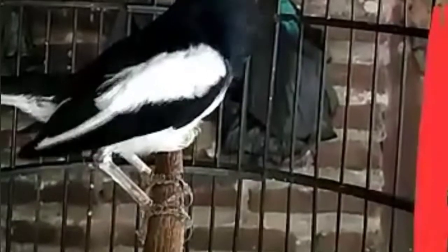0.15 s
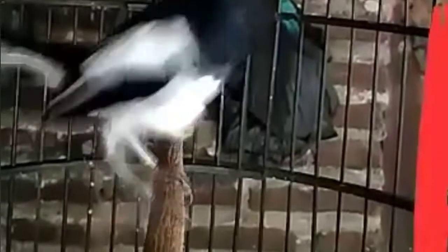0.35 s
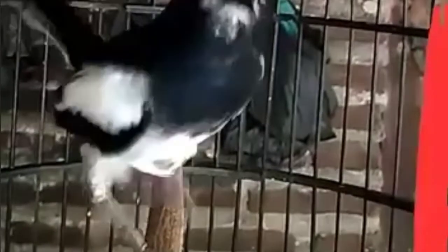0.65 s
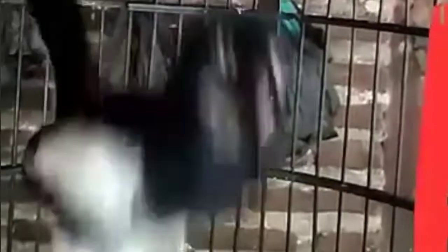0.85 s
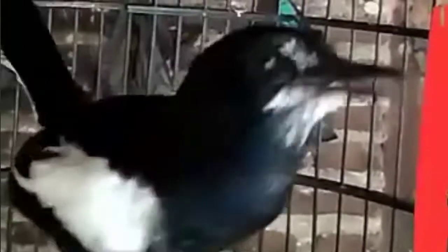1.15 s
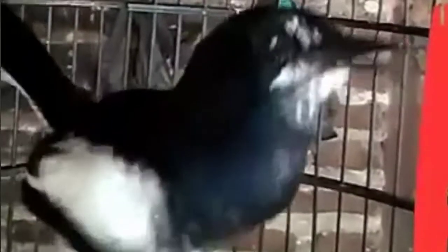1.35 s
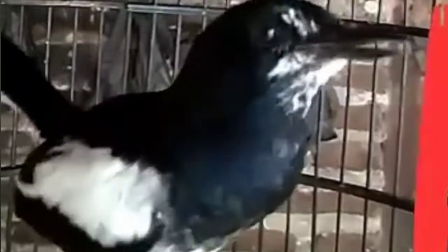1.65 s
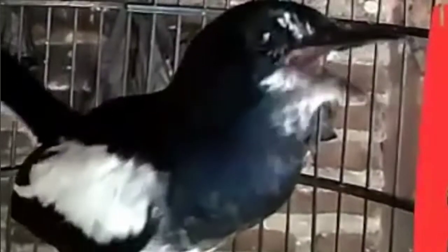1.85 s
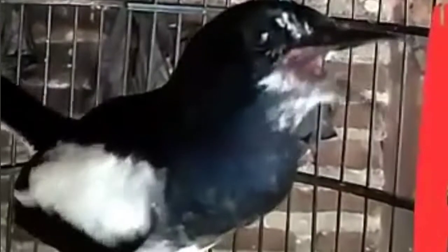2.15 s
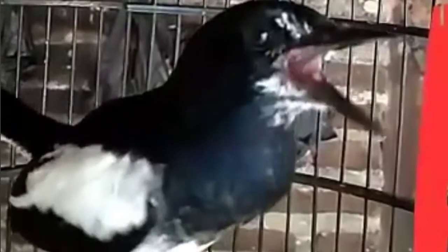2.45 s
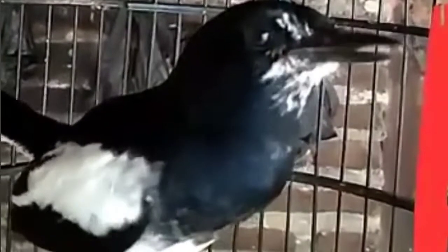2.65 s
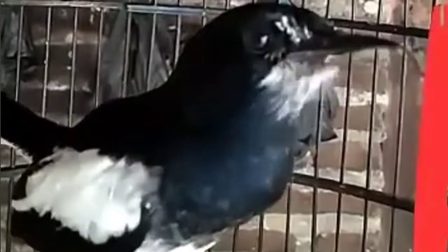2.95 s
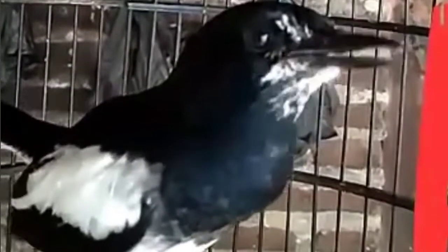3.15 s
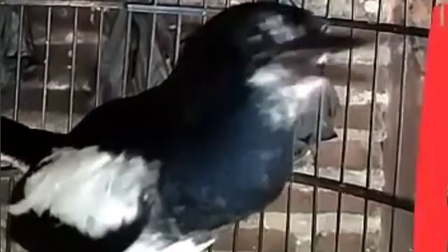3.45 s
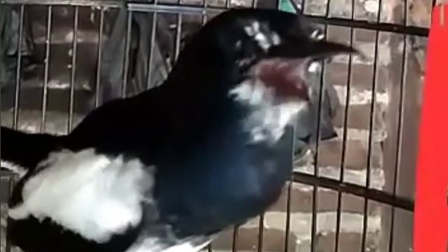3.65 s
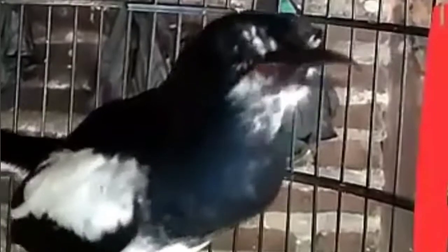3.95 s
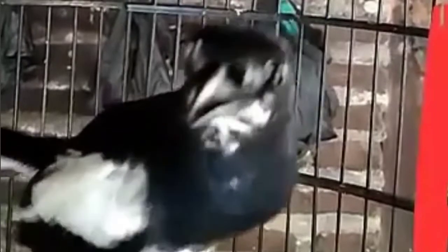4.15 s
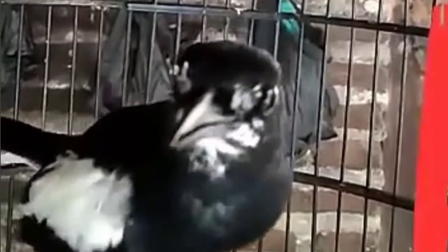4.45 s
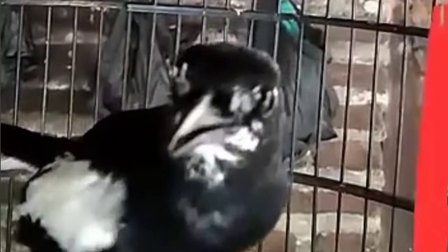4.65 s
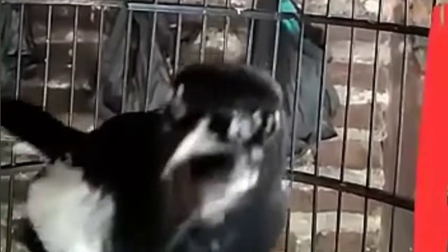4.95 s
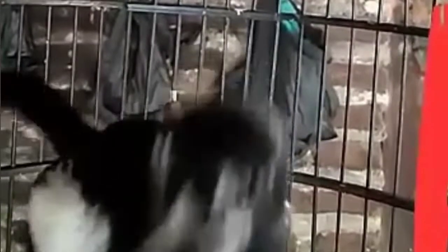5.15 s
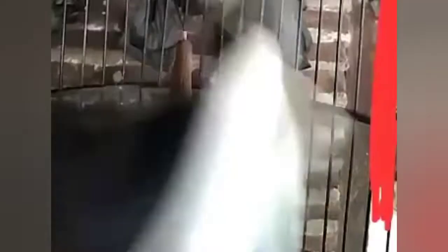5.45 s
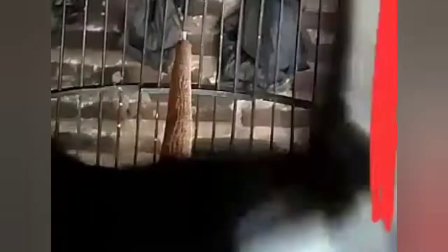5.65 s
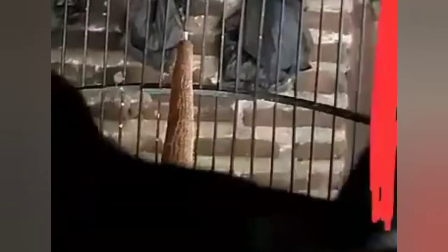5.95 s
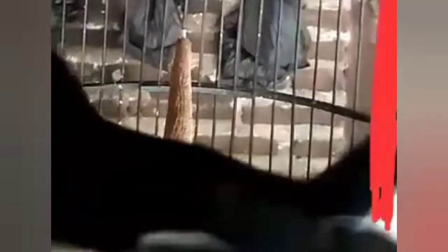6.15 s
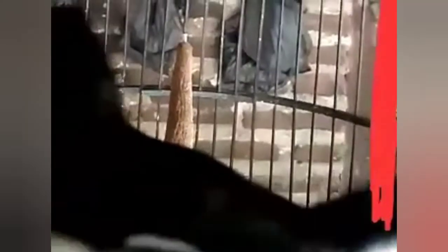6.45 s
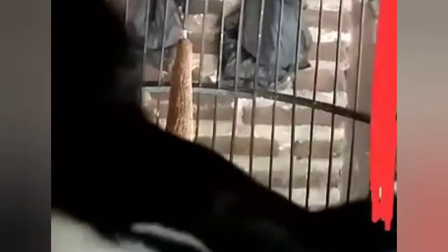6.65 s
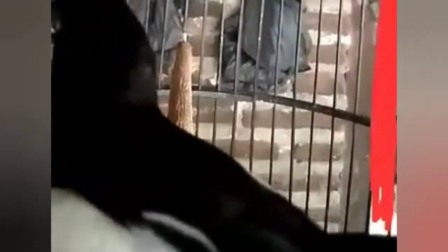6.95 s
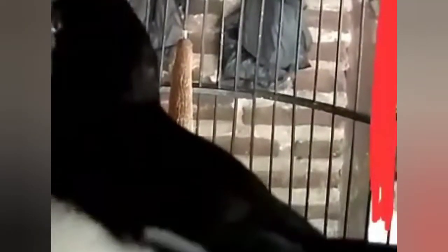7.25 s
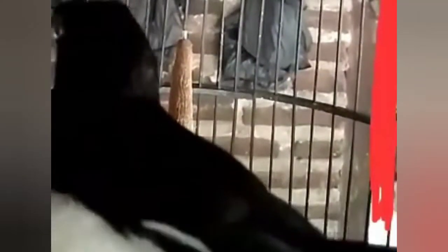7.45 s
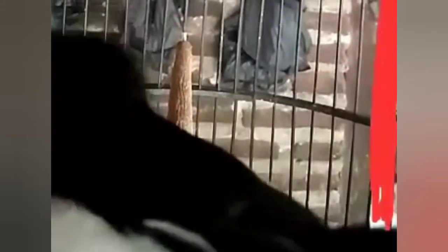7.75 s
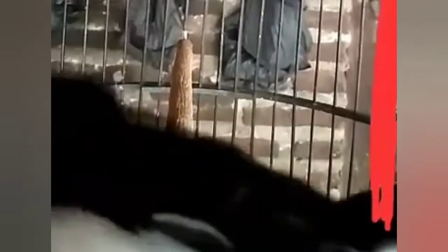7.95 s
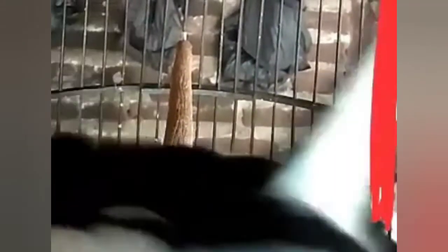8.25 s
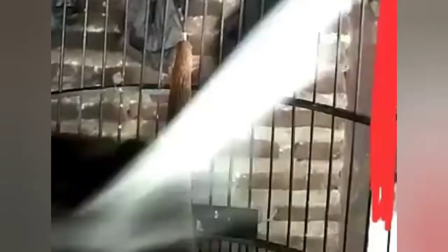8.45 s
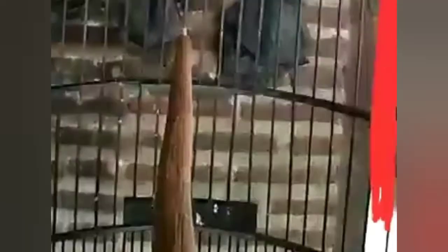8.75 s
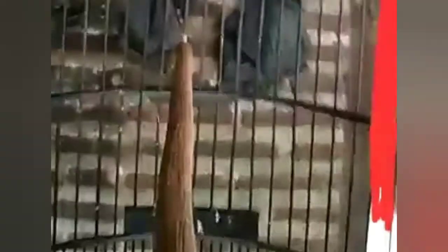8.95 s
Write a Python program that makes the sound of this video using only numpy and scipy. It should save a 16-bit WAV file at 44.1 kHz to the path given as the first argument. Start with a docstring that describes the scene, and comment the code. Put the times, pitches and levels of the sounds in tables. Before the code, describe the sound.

Loud close birdsong indoors, with quick whistles, buzzy double notes, harsh rasps, beak-air thumps and two bright trills, stopping abruptly at the end.

```python
"""A songbird sings close to a pair of microphones in a small hard room, over a faint steady noise.
First a little air from the beak buffets the microphones, then whistles begin: gliding tones with overtones.
Both sides of the syrinx often sound at once, and notes break into rasps of grainy noise.
Near 2 s and again near 5 s comes a trill, each chirp ending in a short burst of bright noise.
Whistles, croaks and rasps go on between and after the trills, until all sound stops just past 9 s."""
import sys
import numpy as np
from scipy import signal
from scipy.fft import rfft, irfft, next_fast_len
from scipy.io import wavfile
from scipy.ndimage import uniform_filter1d

SR = 44100
rng = np.random.default_rng(int(sys.argv[2]) if len(sys.argv) > 2 else 0)


def file_out(sig):
    """Save sig as 16-bit WAV at sys.argv[1]."""
    # one column per channel
    cols = np.atleast_2d(sig).T
    # limit, then scale
    lim = np.clip(cols, -1, 1)
    pcm = np.round(lim * 32767).astype(np.int16)
    wavfile.write(sys.argv[1], SR, pcm)


N = 400869   # length in samples

# Pushes of air through the beak. Each row: start in seconds, length in seconds, rasp level in dB and
# buffeting level in dB (both at the end of the push, before trims), swell up to there in dB.
AIR_PUSHES = [(0.05, 0.084, -59, -47.5, 42), (0.147, 0.094, -31, -34.5, 10),
              (0.226, 0.0083, -10.5, -46, 9.5), (0.302, 0.05, -7.5, -21, 33),
              (0.41, 0.084, -10, -20.5, 23.5), (0.55, 0.033, -13.5, -24.5, 15.5),
              (0.737, 0.24, -22, -23, 9.5), (1.019, 0.071, -12, -15.5, 10), (1.138, 0.04, -10, -22, 22),
              (1.349, 0.034, -28, -70, 14), (1.419, 0.15, -38.5, -68, 10), (1.626, 0.041, -27, -59, 15),
              (1.701, 0.15, -45.5, -81, -8), (1.844, 0.25, -20.5, -26.5, 2),
              (2.19, 0.32, -13.5, -25.5, -1.5), (2.544, 0.012, -18.5, -50, -2),
              (2.585, 0.064, -26, -80, -12), (3.059, 0.071, -11.5, -23, 7.5), (3.34, 0.05, -25.5, -28, 5.5),
              (3.408, 0.037, -20.5, -19.5, 10), (3.601, 0.088, -23.5, -15, 4.5),
              (3.68, 0.026, -11, -33, 13), (3.777, 0.18, -40, -48.5, -19), (4.011, 0.068, -26, -24.5, -9),
              (4.094, 0.05, -16.5, -20, 8.5), (4.334, 0.051, -13.5, -26.5, 14), (4.601, 0.051, -23, -40, 0),
              (4.865, 0.068, -11.5, -19, 7), (4.929, 0.055, -28, -41, -5), (5.002, 0.081, -23, -25.5, -11),
              (5.171, 0.34, -14, -21.5, 0), (5.559, 0.055, -17.5, -35, 6.5), (5.9, 0.054, -15.5, -24, 21),
              (6.089, 0.044, -25, -45, 8.5), (6.258, 0.058, -22.5, -26.5, 2.5), (6.431, 0.039, -22, -37, 2),
              (6.487, 0.021, -16, -51, 9.5), (6.781, 0.07, -17.5, -26, 38.5), (7.12, 0.25, -44, -80, -12),
              (7.675, 0.091, -12.5, -36, 7), (8.01, 0.12, -27, -27.5, 7), (8.123, 0.027, -17, -22, 13),
              (8.32, 0.11, -20, -19.5, 10), (8.416, 0.032, -10, -37, 15), (8.52, 0.18, -35, -47.5, -10),
              (8.796, 0.089, -23.5, -30, 2), (8.899, 0.053, -17, -33.5, 1.5), (8.958, 0.086, -32, -65, -12)]
# Colour of the rasp. Each row: frequency in Hz, relative level in dB per Hz.
RASP_SPECTRUM = [(240, -53.5), (400, -8), (1010, -2.5), (1910, 2.5), (4010, 1), (5320, -0.5), (12900, -11),
                 (14000, -28)]
# Where the bird stands. Each row: time in seconds, level of the right microphone in dB,
# delay of the left microphone behind the right in milliseconds.
STANCE = [(0, -7.5, 0.1), (4.5, -6.5, 0.09), (6.5, -6, 0.019), (9.1, -9.5, 0.034)]

# Voices. Each one: 2nd harmonic in dB and 3rd harmonic in dB (against the first), flutter from 0 to 1.
CLEAR_VOICE, EDGED_VOICE, NASAL_VOICE = (-22.5, -27, 0.086), (-18.5, -27, 0.099), (0.43, -6.5, 0.21)
STEADY_VOICE, SHAKY_VOICE = (-27, -33, .025), (-16.5, -26, 0.36)
REEDY_VOICE, HOARSE_VOICE = (5, -6, 0.013), (-29, -48, 0.66)

# Clear whistles, almost pure tones. Each row: start in seconds, length in seconds, first pitch in Hz,
# last pitch in Hz, level in dB.
CLEAR_WHISTLES = [(0.143, 0.0076, 7600, 6160, -27.5), (0.48, 0.069, 3530, 3675, -20),
                  (0.785, 0.048, 1147, 1360, -18.5), (0.238, 0.017, 4820, 4320, -11),
                  (0.266, 0.027, 3770, 3100, -17.5), (0.329, 0.013, 3900, 3860, -11.5),
                  (0.339, 0.011, 3430, 2320, -11.5), (0.449, 0.016, 7830, 8500, -16),
                  (0.857, 0.05, 1524, 1569, -11), (0.984, 0.044, 1243, 1343, -18),
                  (1.073, 0.067, 1500, 1164, -17.5), (1.068, 0.02, 4470, 3030, -18),
                  (1.08, 0.051, 4030, 3650, -23), (1.281, 0.042, 3080, 2883, -19),
                  (1.282, 0.06, 2165, 2420, -25.5), (1.367, 0.019, 4000, 2700, -13),
                  (1.652, 0.023, 3760, 2890, -16.5), (7.53, 0.47, 840, 847, -51),
                  (2.09, 0.017, 1772, 1755, -9.5), (2.117, 0.057, 1722, 1718, -10),
                  (2.156, 0.033, 1714, 1790, -20.5), (2.211, 0.082, 1852, 1823, -7),
                  (2.306, 0.047, 1740, 1816, -26), (2.356, 0.065, 1870, 1915, -11.5),
                  (2.418, 0.058, 1877, 2004, -12.5), (2.461, 0.048, 2023, 2030, -19),
                  (2.642, 0.09, 2340, 2450, -23), (2.84, 0.047, 2907, 2948, -24),
                  (0.748, 0.034, 913, 990, -29.5)]
# Whistles with an audible octave. Each row: start in seconds, length in seconds, first pitch in Hz,
# last pitch in Hz, level in dB.
EDGED_WHISTLES = [(0.148, 0.044, 6070, 5735, -16.5), (0.182, 0.06, 1882, 2023, -25.5),
                  (0.259, 0.077, 1963, 2152, -17.5), (0.432, 0.049, 2270, 2360, -25),
                  (0.503, 0.052, 2366, 2405, -10.5), (1.422, 0.11, 770, 1024, -28),
                  (1.63, 0.11, 776, 1013, -29), (1.823, 0.1, 829, 900, -29.5),
                  (4.981, 0.024, 1380, 1300, -22), (8.8, 0.037, 4790, 4620, -21)]
# Freer figures, each sung once. Each entry: a voice, then rows of time in seconds, pitch in Hz, level in dB.
FIGURES = [ (EDGED_VOICE, [(0.545, 2700, -11), (0.56, 3250, -23.5), (0.578, 3485, -6), (0.584, 2600, -20)]),
           (NASAL_VOICE, [(0.584, 2474, -16.5), (0.602, 2630, -8.5)]), (SHAKY_VOICE, [(1.03, 3940, -30.5),
           (1.048, 4860, -22.5), (1.075, 5190, -32.5), (1.14, 5200, -18)]),
           (REEDY_VOICE, [(4.009, 1794, -37), (4.021, 2450, -20), (4.055, 2560, -25)]),
           (NASAL_VOICE, [(8.918, 2040, -27), (8.94, 1955, -33), (8.958, 1890, -29)]),
           (SHAKY_VOICE, [(4.129, 5570, -31), (4.14, 4400, -22), (4.152, 3800, -21.5), (4.163, 4330, -13.5),
           (4.168, 3670, -15.5), (4.195, 3380, -27.5)]), (SHAKY_VOICE, [(5.034, 1636, -17),
           (5.05, 1892, -23.5), (5.07, 1630, -25.5), (5.094, 2144, -22.5), (5.112, 2200, -16),
           (5.121, 1914, -31), (5.14, 2240, -19)]), (SHAKY_VOICE, [(8.995, 1790, -25), (9.006, 2090, -17.5),
           (9.025, 1726, -26.5), (9.045, 1880, -24.5), (9.064, 1630, -32.5)]),
           (NASAL_VOICE, [(0.738, 2720, -22.5), (0.756, 2924, -19), (0.798, 2560, -14), (0.813, 2810, -27),
           (0.876, 2896, -18.5), (0.899, 2697, -9.5)]), ((-17, -17, 0.38), [(0.93, 3010, -26),
           (0.945, 3810, -13.5), (0.97, 3860, -24.5), (0.99, 3845, -9), (1.003, 3740, -35)]),
           ((-39, -45, 0.23), [(1.148, 2920, -32), (1.158, 3100, -10), (1.172, 3240, -4),
           (1.182, 2740, -20), (1.186, 2730, -8.5), (1.212, 2524, -19), (1.218, 2380, -15.5),
           (1.24, 1970, -17)]), (CLEAR_VOICE, [(1.853, 3060, -17), (1.865, 3465, -17.5),
           (1.885, 3280, -10.5), (1.903, 3310, -17.5), (1.927, 3615, -17), (1.939, 3385, -10),
           (1.957, 3500, -25), (1.975, 3300, -15.5)]), (EDGED_VOICE, [(1.919, 1165, -21),
           (1.955, 1372, -23.5), (1.981, 1774, -6), (2.028, 1690, -28.5), (2.062, 1720, -20)]),
           (CLEAR_VOICE, [(2.739, 2040, -18), (2.757, 2656, -12), (2.79, 2070, -20), (2.799, 1850, -22),
           (2.82, 1880, -25)]), (REEDY_VOICE, [(3.598, 2420, -20), (3.608, 2440, -17), (3.626, 2276, -17.5),
           (3.65, 2346, -18), (3.732, 2380, -20), (3.76, 2490, -37)]), (CLEAR_VOICE, [(4.867, 2750, -18.5),
           (4.876, 3570, -16.5), (4.889, 3720, -20), (4.901, 3473, -8), (4.913, 3500, -15),
           (4.926, 3710, -12), (4.94, 3610, -14.5), (4.953, 3776, -8), (4.965, 3530, -27.5),
           (4.98, 3800, -46)]), ((11.8, -17, 0.23), [(5.556, 1336, -18), (5.575, 1315, -9),
           (5.612, 1291, -10.5), (5.627, 1230, -49)]), (STEADY_VOICE, [(5.88, 2840, -34.5),
           (5.904, 2663, -11), (5.918, 2622, -8), (5.928, 2720, -6.5), (5.936, 3510, -16.5),
           (5.94, 3606, -11.5), (5.974, 3452, -6), (5.986, 3790, -24.5)]),
           (STEADY_VOICE, [(6.07, 2536, -31.5), (6.084, 1990, -25.5), (6.098, 2020, -16.5),
           (6.106, 2100, -17), (6.114, 2526, -7), (6.14, 2502, -3), (6.158, 2650, -36)]),
           (EDGED_VOICE, [(6.215, 4950, -38), (6.245, 4585, -23.5), (6.3, 4577, -19), (6.322, 4490, -14),
           (6.334, 3230, -25.5)]), ((6.1, 8.8, 0.17), [(6.199, 1621, -24), (6.25, 1585, -32),
           (6.313, 1855, -35.5), (6.349, 1900, -28.5), (6.402, 1707, -23.5), (6.426, 1640, -39)]),
           (CLEAR_VOICE, [(6.405, 2600, -33), (6.425, 2620, -14), (6.445, 2580, -8.5), (6.457, 3117, -8.5),
           (6.473, 2420, -8), (6.483, 2280, -15), (6.513, 2190, -24)]), ((-11.5, -19, 0.086),
           [(6.736, 3530, -30), (6.77, 3874, -25), (6.846, 4363, -20.5), (7.03, 4165, -28),
           (7.11, 4020, -25.5)]), ((-12.5, -20, 0.17), [(7.105, 3903, -25), (7.2, 3470, -18.5),
           (7.32, 2890, -26), (7.366, 2777, -22), (7.39, 2810, -61)]), ((-1.5, -0.44, 0.17),
           [(6.819, 1455, -40), (6.887, 1623, -34), (6.975, 1924, -28.5), (7.01, 1900, -31.5),
           (7.1, 1514, -33.5)]), (REEDY_VOICE, [(8.319, 2630, -26), (8.328, 2406, -18),
           (8.352, 2310, -18.5), (8.396, 2564, -21), (8.44, 2474, -26), (8.46, 2390, -11.5)]),
           ((9.2, 7.9, 0.1), [(8.518, 1990, -22), (8.53, 1930, -24.5), (8.6, 1970, -21), (8.65, 1938, -22),
           (8.68, 1860, -22.5)]), ]
# Syllables sung from a set shape. Each entry: a voice; shape rows of share of the length, pitch in Hz,
# level in dB; sung rows of start in seconds, length in seconds, pitch ratio, added level in dB.
SYLLABLES = { "drop": ((-15.5, -22, 0.078), [(0, 2584, -6), (.3, 2343, -2), (.75, 1750, -8), (1, 1503, -4)],
             [(1.356, 0.025, 0.98, -9.5), (1.638, 0.028, 1.01, -9)]), "double": ((-23, -45, 0.077),
             [(0, 1332, -21), (.15, 1265, 2.5), (.3, 1333, -10), (.52, 1278, 7), (.7, 1290, -21),
             (1, 1325, -6.5)], [(1.533, 0.039, 1.005, -17), (1.718, 0.063, .995, -17)]),
             "croak": ((5.8, 10.9, 0.012), [(0, 1005, 5), (.25, 1192, 6.5), (.55, 1167, 3),
             (.85, 1050, 10.5), (1, 946, 2)], [(3.038, 0.15, .99, -29.5), (7.658, .15, 1.04, -33.5)]),
             "arch": ((1, -8, 0.035), [(0, 2575, -6.5), (.09, 2918, 1.5), (.55, 3026, 2), (.8, 2960, 4),
             (1, 2448, 3.5)], [(3.327, 0.15, .995, -20), (8.007, 0.16, 1.015, -19.5)]),
             "flat": ((0.79, 0.19, 0.067), [(0, 1787, 10), (.06, 1923, 0.5), (.3, 1842, 6), (.72, 1902, 2),
             (.86, 1740, 7.5), (1, 1780, -22)], [(3.773, 0.16, 1, -24)]), "loop": ((-11, -12, 0.16),
             [(0, 1758, -19), (.07, 2430, -6), (.24, 2600, -3), (.28, 3000, -2.5), (.31, 3845, -2.5),
             (.39, 4186, -1.5), (.575, 4280, -2.5), (.61, 3300, -0.5), (.68, 2460, -1.5),
             (.82, 1920, -12.5), (1, 1676, -12.5)], [(4.008, .187, .995, -15), (8.785, .19, 1.04, -22)]),
             "kick": ((-16, -23, 0.063), [(0, 2084, -20.5), (.08, 1980, -14.5), (.16, 1891, -12.5),
             (.23, 3237, 0.5), (.27, 2284, -3), (.55, 2420, -2.5), (.86, 2419, -2.5), (1, 2215, -8.5)],
             [(4.336, 0.094, 1.005, -5.5), (4.593, 0.088, .99, -5.5)]), }
# Hoarse whistles, shaken into a buzz. Each row: start in seconds, length in seconds, first pitch in Hz,
# last pitch in Hz, level in dB.
HOARSE_WHISTLES = [(2.566, 0.09, 2540, 2416, -18), (8.578, 0.051, 2330, 2120, -21.5),
                   (8.972, 0.025, 2554, 2555, -17), (2.597, 0.046, 1520, 1100, -34),
                   (5.563, 0.055, 3180, 3295, -21.5), (5.564, 0.058, 2023, 2044, -25.5)]

# Chirps of the two trills. Each row: middle of the chirp in seconds, chirp level in dB, pitch ratio,
# seconds until the burst of air, burst level in dB.
TRILL_CHIRPS = [(2.019, -16, 0.94, 0.0094, -39.5), (2.053, -13.5, 0.98, 0.026, -24),
                (2.204, -13.5, 0.96, 0.01, -19), (2.256, -13, 0.95, 0.015, -20),
                (2.313, -16.5, 1.0, 0.019, -16), (2.371, -16.5, 0.93, 0.014, -18),
                (2.433, -17, 0.97, 0.0053, -25), (2.489, -20.5, 0.86, 0.012, -12),
                (5.023, -9.5, 1.014, 0.015, -33.5), (5.063, -11.5, 0.99, 0.016, -13.5),
                (5.19, -11.5, 1.005, 0.021, -14.5), (5.243, -14, 0.98, 0.016, -13),
                (5.297, -13.5, 0.96, 0.016, -9.5), (5.357, -15, 0.98, 0.011, -11),
                (5.417, -17, 0.97, 0.013, -13.5), (5.489, -20, 0.88, 0.018, -13)]
# Shape of one chirp. Each row: seconds from its middle, pitch in Hz before the ratio, added level in dB.
CHIRP_SHAPE = [(-.017, 2513, -10), (-.011, 3400, -3), (.0, 3500, 0), (.010, 3420, 0), (0.016, 2600, -3)]
# Voices of the first and second trill. Each row: 2nd harmonic in dB, 3rd harmonic in dB, flutter from 0 to 1.
CHIRP_VOICES = [(-5.5, -24.5, 0.1), (-13.5, -23, 0.09)]


def from_db(db):
    """Turns decibels into gain."""
    return 10 ** (np.asarray(db) / 20)


def rms_one(x):
    """Scales a sound to an rms (average strength) of 1."""
    return x / np.sqrt(np.mean(x ** 2) + 1e-20)


def in_time(rows, at):
    """Reads the columns of a table at the times given, with straight lines between rows."""
    s, *columns = np.transpose(rows)
    return [np.interp(at, s, column) for column in columns]


def band(x, low_hz, high_hz):
    """Lets through the frequencies between two limits (Butterworth filter)."""
    return signal.sosfilt(signal.butter(2, [low_hz, high_hz], "band", fs=SR, output="sos"), x)


def coloured(x, spectrum):
    """Shapes a sound by a spectrum table and scales it to an rms of 1."""
    hz, db = np.transpose(spectrum)
    size = next_fast_len(N)
    grid = np.arange(1, size // 2 + 2) * SR / size
    gain = from_db(np.interp(np.log(grid), np.log(hz), db))
    return rms_one(irfft(rfft(x, size) * gain, size)[..., :N])


def faint_floor():
    """A faint steady noise, drawn separately for each microphone."""
    return from_db(-67) * rms_one(band(rng.standard_normal((2, N)), 40, 5100))


def air_pushes(t):
    """Rasp and buffeting in dB: each push starts sharply, swells, is cut off, fades; the strongest counts."""
    coarse = t[::40]
    s, length, rasp_db, buffet_db, swell_db = np.transpose(AIR_PUSHES)[:, :, None]
    after = np.maximum(coarse - s - length, 0)
    # slopes are in dB per second; the steep cut gives way to the slower fade
    rise_db = 2504.5 * np.maximum(s - coarse, 0)
    fall_db = np.minimum(591.5 * after, 11.5 + 182.5 * after)
    short_db = swell_db * np.clip(1 - (coarse - s) / length, 0, 1)
    levels = []
    for end_db in (rasp_db, buffet_db):
        strongest = np.max(end_db - short_db - rise_db - fall_db, axis=0)
        levels.append(np.interp(t, coarse, np.maximum(strongest, -107.5)))
    return levels


def turbulence(grain_db, alike):
    """Rough air: grainy noise for two microphones that share a part of it (alike, 0 to 1)."""
    grains = rng.standard_normal((3, N)) * from_db(grain_db * rng.standard_normal(N))
    return np.sqrt(alike) * grains[0] + np.sqrt(1 - alike) * grains[1:]


def smooth(x, bands, frames):
    """Averages a time-frequency picture over nearby bands and frames."""
    return uniform_filter1d(uniform_filter1d(x, size=bands, axis=0), size=frames, axis=1)


def flickering(noise):
    """Lays a random flicker over a finished noise: narrow bands of it come and go, most in the treble."""
    spectrum = signal.stft(noise, nperseg=512)[2]
    narrow = rng.standard_normal(spectrum.shape[1:])
    for _ in range(2):
        narrow = smooth(narrow, bands=3, frames=15)
    broad = smooth(rng.standard_normal(narrow.shape), bands=24, frames=5)
    depth_db = np.linspace(2, 12, len(narrow))[:, None]   # from bass to treble
    flicker_db = depth_db * rms_one(narrow) + 3 * rms_one(broad)
    return signal.istft(spectrum * from_db(flicker_db), nperseg=512)[1][:, :N]


def rasp(level_db):
    """Voice broken into noise: grainy turbulence, coloured; the flicker laid over it is no part of the voice."""
    noise = coloured(turbulence(grain_db=4.0, alike=0.13), RASP_SPECTRUM)
    return from_db(level_db - 3.5) * rms_one(flickering(noise))


def buffeting(level_db):
    """Lumpy low noise where the air hits the ports, much stronger on the near (left) one."""
    low = band(turbulence(grain_db=8.5, alike=0.11), 0.67, 261)
    lumps = band(rng.standard_normal((2, N)), 5.3, 24)
    low = low * from_db(3.77 * rms_one(lumps))
    side_db = np.array([[0.0], [-4.0]])
    return from_db(level_db + side_db) * rms_one(low)


def whistle(s, length, first_hz, last_hz, db):
    """A straight glide that swells in, holds and dies away, as rows of time, pitch and level."""
    attack_share = min(0.005 / length, .4)   # 5 ms, or less in very short notes
    shares = np.array([0, attack_share, 0.935, 1])
    return np.c_[s + shares * length, first_hz + shares * (last_hz - first_hz), db - np.array([17, 0, 0, 8.5])]


def add_note(out, rows, voice, tremor, later_s):
    """Harmonics on a gliding pitch; an unsteady membrane shakes level and pitch; air noise fringes each one."""
    second_db, third_db, flutter = voice
    at = np.arange(round(rows[0][0] * SR), min(round(rows[-1][0] * SR), N))
    t = at / SR
    hz, db = in_time(rows, t)
    hz = uniform_filter1d(hz, size=130, mode="nearest")   # rounds the corners of the glide
    hz = hz * (1 + 0.07 * flutter * tremor[0, at])
    edge = np.clip(np.minimum(t - t[0], t[-1] - t) / 0.0027, 0, 1)   # soft start and end, in seconds
    shake = np.maximum(1 + 1.47 * flutter * tremor[1, at], 0)
    level = np.sqrt(2) * from_db(db) * edge * shake
    # above the third, each harmonic is weaker by a steady step, small in reedy voices
    step_db = max(3.5 - .2 * third_db, 3.2)
    gains = from_db(np.r_[0, second_db, third_db - step_db * np.arange(6)])
    gains = gains / np.sqrt(np.sum(gains[:3] ** 2))
    turns = np.cumsum(hz) / SR
    # the sound reaches the right microphone ahead of the left
    for side, ahead in enumerate([0, hz * later_s[at]]):
        for k, gain in enumerate(gains, 1):
            fringe = 1 + min(.07 * (k - .7), .8) * tremor[2 + side, at + 500 * k]
            audible = k * hz < 13500
            wave = np.sin(2 * np.pi * k * (turns + ahead) + k * k)
            out[side, at] += gain * level * fringe * audible * wave


def song(later_s):
    """All whistles, figures, syllables and trill chirps, each a set of harmonics, at the two microphones."""
    out = np.zeros((2, N))
    white = rng.standard_normal((4, N + SR))
    # one wobble for pitch, one for level, then air noise for each side
    wobbles = [*band(white[:2], 33, 190), *band(white[2:], 75, 300)]
    tremor = np.array([rms_one(wobble) for wobble in wobbles])
    notes = [(CLEAR_VOICE, whistle(*row)) for row in CLEAR_WHISTLES]
    notes += [(EDGED_VOICE, whistle(*row)) for row in EDGED_WHISTLES]
    notes += FIGURES
    notes += [(HOARSE_VOICE, whistle(*row)) for row in HOARSE_WHISTLES]
    for voice, shape, sung in SYLLABLES.values():
        for s, length, ratio, db in sung:
            notes.append((voice, np.array(shape) * [length, ratio, 1] + [s, 0, db]))
    for s, db, ratio, wait, burst_db in TRILL_CHIRPS:
        voice = CHIRP_VOICES[int(s > 4)]   # the second trill comes after 4 s
        notes.append((voice, np.array(CHIRP_SHAPE) * [1, ratio, 1] + [s, 0, db]))
    for voice, rows in notes:
        add_note(out, rows, voice, tremor, later_s)
    return out


def room(x):
    """Echoes of a small hard room: a dense tail, its own in each microphone, 60 dB down after 0.24 s."""
    t = np.arange(SR // 2) / SR
    tail = rng.standard_normal((2, len(t))) * from_db(-60 * t / 0.24) * (t > .004)
    tail = band(tail, 450, 19845)
    tail = tail / np.sqrt(np.sum(tail ** 2, axis=1, keepdims=True))
    return signal.fftconvolve(x, tail, axes=1)[:, :N]


def trill_breathing(depth_db):
    """In a trill the air comes in one push per chirp and sinks between them; the result is in dB."""
    middles = np.array(TRILL_CHIRPS)[:, :1] + .01
    since = np.min(np.abs(np.arange(N) / SR - middles), axis=0)
    return -depth_db * np.sin(np.pi * np.minimum(since / 0.048, 1)) ** 2


def bursts():
    """The beak snaps each chirp shut with a short bright hiss: noise under a bell-shaped swell."""
    t, level = np.arange(N) / SR, np.zeros(N)
    for s, db, ratio, wait, burst_db in TRILL_CHIRPS:
        level += from_db(burst_db) * np.exp(-.5 * ((t - s - wait) / 0.004) ** 2)
    return level * rms_one(band(turbulence(grain_db=5.5, alike=0.047), 4900, 8400))


def mute_weak_bands(x, under_db, top_under_db):
    """Mutes narrow bands while they lie far under louder neighbours, sooner in the treble."""
    spectrum = signal.stft(x, nperseg=1024)[2]
    rows = spectrum[:, :512].reshape(2, 64, 8, -1)   # 64 bands of 8 frequency bins
    db = 10 * np.log10(np.mean(np.abs(rows) ** 2, axis=(0, 2)) + 1e-14)
    db = uniform_filter1d(db, size=7, axis=1)
    # a neighbour counts for 1.5 dB less with each band of distance
    apart = np.abs(np.arange(64)[:, None] - np.arange(64))[:, :, None]
    neighbours = np.max(db[None] - 1.5 * apart, axis=1)
    allowed_db = np.linspace(under_db, top_under_db, 64)[:, None]
    keep = np.clip((db - neighbours + allowed_db) / 2, 0, 1)
    keep[:6] = 1   # the lowest bands always pass
    spectrum[:, :512] *= np.repeat(keep, 8, axis=0)
    return signal.istft(spectrum, nperseg=1024)[1][:, :N]


def scene():
    """Bird, air, room and a faint floor, mixed for the left (near) and right (far) microphone."""
    t = np.arange(N) / SR
    rasp_db, buffet_db = air_pushes(t)
    right_db, later_ms = in_time(STANCE, t)
    breath_db = trill_breathing(depth_db=14.0)
    voice = song(later_ms / 1000) + bursts()
    mix = voice + from_db(-10) * room(voice)
    mix += rasp(rasp_db + breath_db) + buffeting(buffet_db + breath_db)
    treble = band(mix[1], 11000, 19845)
    mix[1] = from_db(right_db) * (mix[1] + 1.9 * treble)   # the far port favours the treble
    return mix + faint_floor()


def roll_off(x):
    """The treble ends steeply here."""
    return signal.sosfilt(signal.butter(12, 14330, fs=SR, output="sos"), x)


def record(dry):
    """Rounds the peaks, mutes weak bands, cuts the top and ends all sound at 9.066 s."""
    x = mute_weak_bands(np.tanh(dry), under_db=22, top_under_db=-3)
    x = signal.sosfilt(signal.cheby2(10, 50, 14300, fs=SR, output="sos"), x)
    x = x * np.clip((9.066 - np.arange(N) / SR) * 250, 0, 1)   # a 4 ms fade
    return roll_off(x)


dry = scene()
out = record(dry)
file_out(out)
```